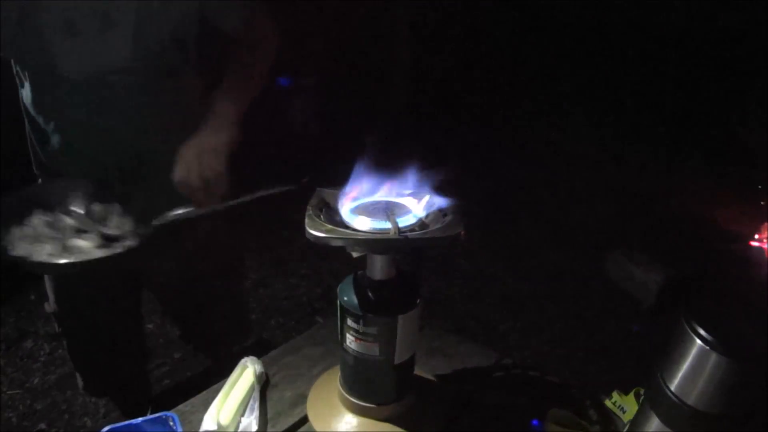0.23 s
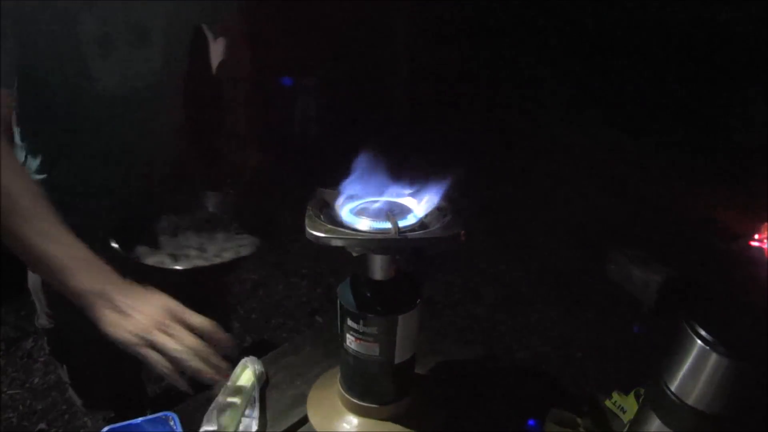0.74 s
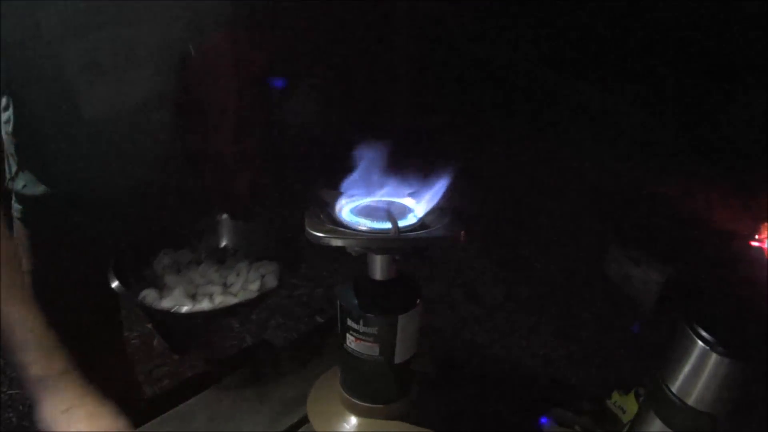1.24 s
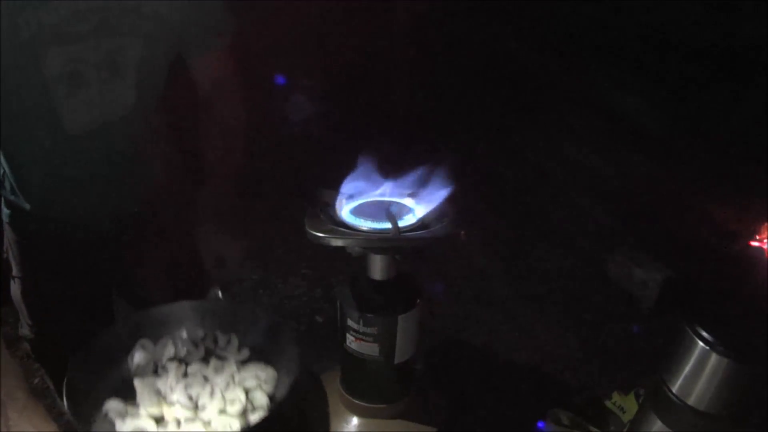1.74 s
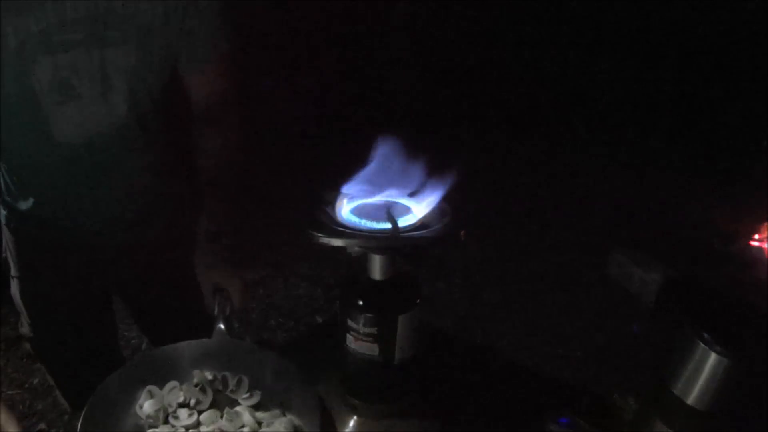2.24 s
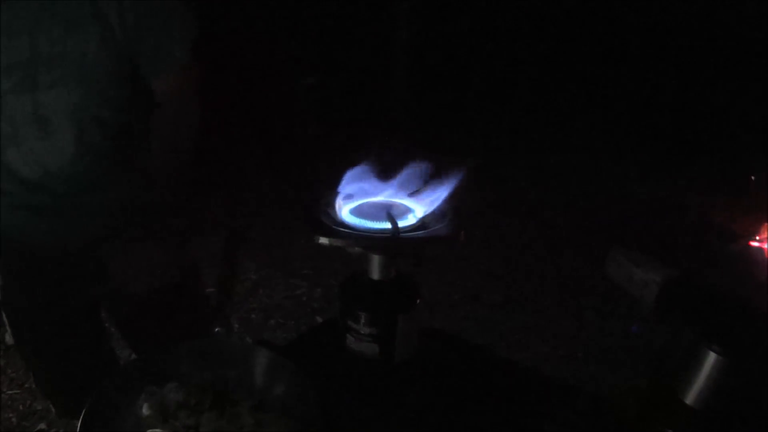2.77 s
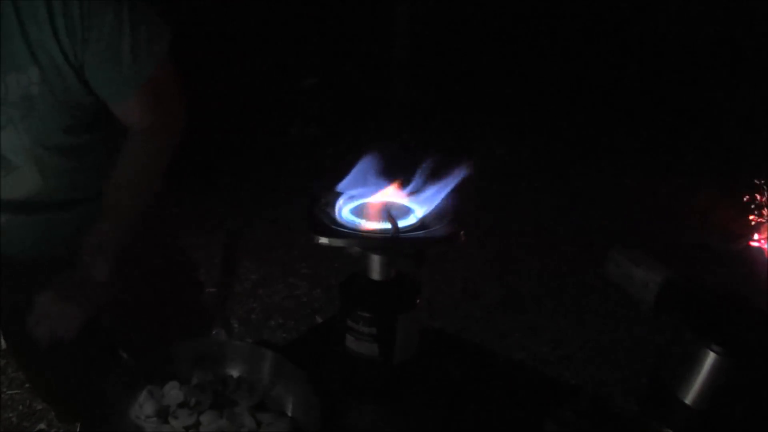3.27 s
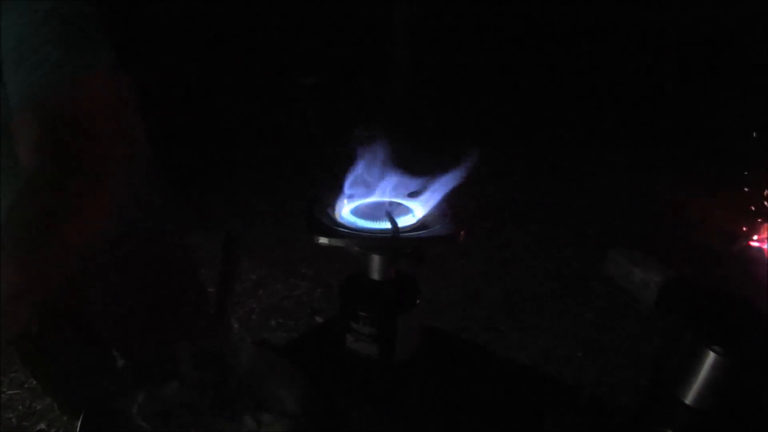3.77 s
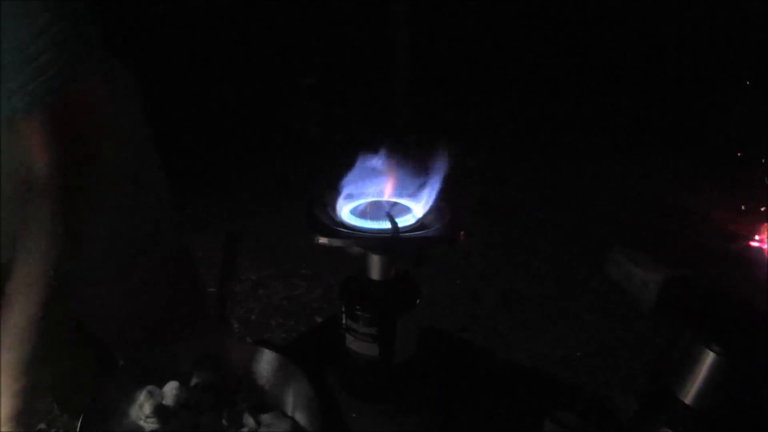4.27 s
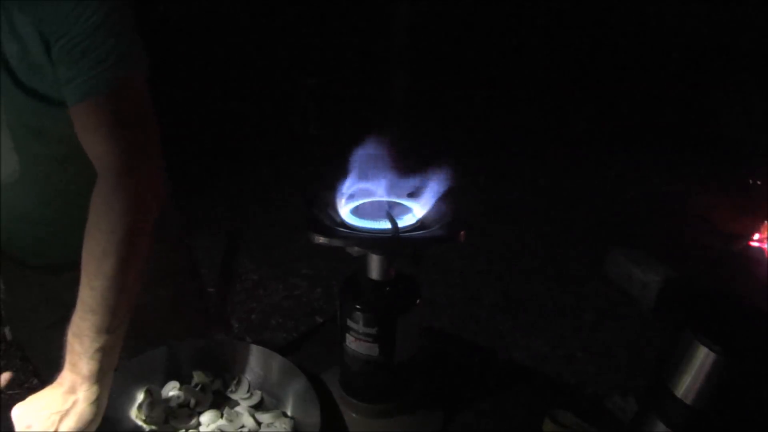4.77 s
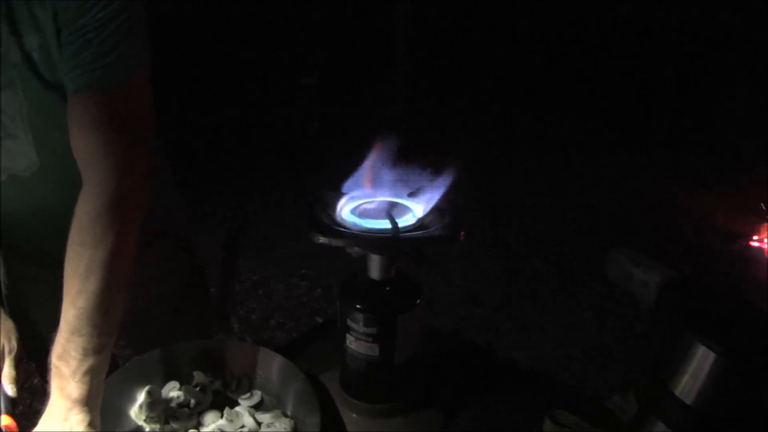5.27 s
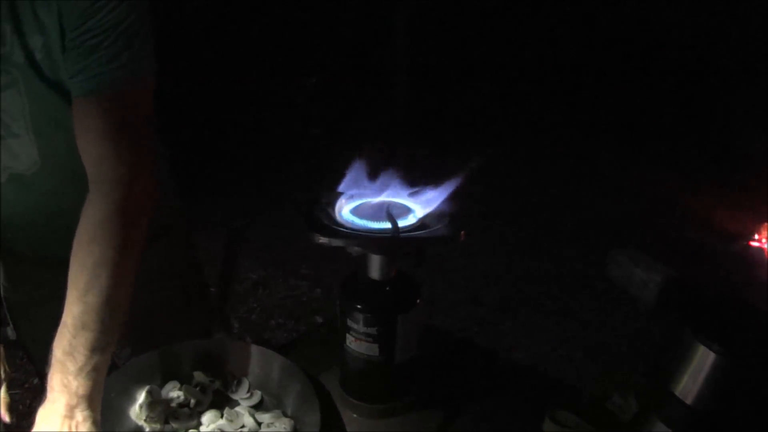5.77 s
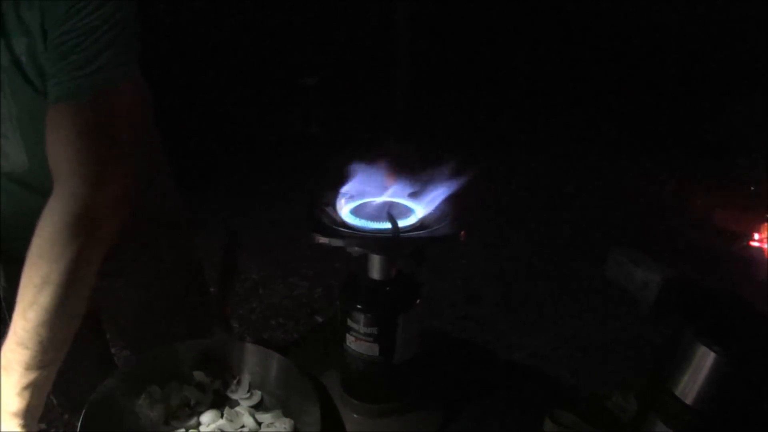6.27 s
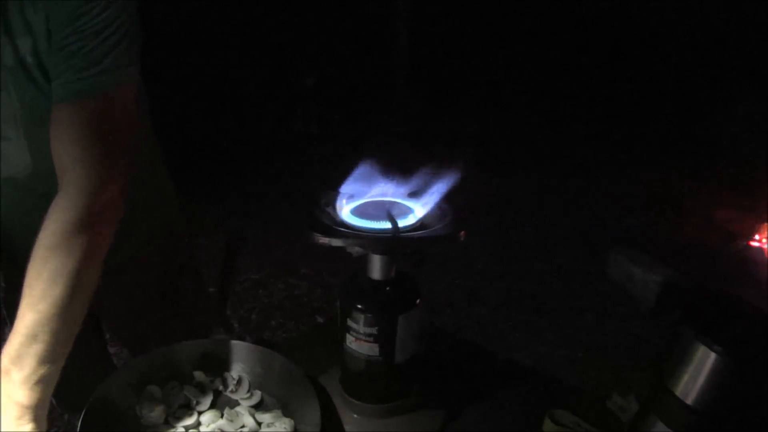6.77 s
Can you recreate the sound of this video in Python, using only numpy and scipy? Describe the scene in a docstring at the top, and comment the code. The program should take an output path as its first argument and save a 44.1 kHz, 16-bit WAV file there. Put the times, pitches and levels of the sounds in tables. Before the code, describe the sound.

Constant bright hiss of a burning camp burner outdoors, with brief film rustling, scattered wooden knocks, a quick stuttering scrape and small dry snaps.

```python
"""Outdoors at night, a propane camp stove burns at full flame: noise shaped by the resonances of its mixing
tube makes the jet's hiss, and low flickering noise makes the flutter of the flame. The cook rustles a
wrapper (showers of tiny creases), drags a thing over the wooden table (a row of slips) and knocks on it
(pushes filtered by the boards). A campfire off to the right snaps now and then, and faint air rumbles."""
import sys
import numpy as np
from scipy import signal
from scipy.fft import rfft, irfft
from scipy.io import wavfile
from scipy.ndimage import uniform_filter1d, map_coordinates

SR = 44100
rng = np.random.default_rng(int(sys.argv[2]) if len(sys.argv) > 2 else 0)


def digitize_waveform(pressure):
    """Quantize a signal to 16-bit integers and store it at the path in sys.argv[1].

    Rows of a 2-D input are taken as channels; values are limited to [-1, 1].
    """
    field = np.atleast_2d(pressure).T
    bounded = np.clip(field, -1, 1)
    quanta = np.round(bounded * 32767).astype(np.int16)
    wavfile.write(sys.argv[1], SR, quanta)


N = 309141

# Resonances of the mixing tube and burner head.
# Each row: frequency in Hz, half-power width in Hz, height in dB on the same relative scale as the jet.
TUBE_MODES = [(1350, 380, -22), (1965, 303, -17.5), (2520, 705, -15), (3090, 480, -14.5), (3873, 320, -15),
              (4220, 370, -15.5), (4622, 230, -2), (4783, 252, -2), (5345, 250, -12.5), (5787, 323, -11),
              (6610, 570, -18), (7580, 300, -15.5), (7797, 246, -11)]
# Broad hiss of the jet. Each row: frequency in Hz, relative density in dB per Hz.
JET_SPECTRUM = [(200, -48), (900, -29), (3000, -33.5), (7000, -31), (8300, -29), (8900, -31.5), (9400, -28),
                (10500, -30.5), (11000, -32.5)]
# Roar of the flame. Each row: frequency in Hz, relative density in dB per Hz.
ROAR_SPECTRUM = [(15, -29), (43, -20), (65, -11), (100, -3), (165, 2), (225, -3), (305, 1), (435, -11),
                 (600, -7.5), (720, -10), (950, -15.5), (1600, -20), (4000, -32)]
# How alike the stove sounds left and right. Each row: frequency in Hz, likeness (held between 0 and 1).
STOVE_LIKENESS = [(30, 1.06), (250, 0.89), (600, 0.67), (1000, 0.59), (1400, 0.78), (1620, 0.53),
                  (1900, 0.81), (3000, 0.9), (4200, 0.81), (4700, 1.03), (5300, 0.84), (7100, 0.9),
                  (7800, 0.93), (8400, 0.86)]
# Where the stove sits in the stereo picture. Each row: frequency in Hz, left minus right in dB.
STOVE_BALANCE = [(100, 0.5), (350, -0.6), (900, -3), (1500, .5), (2400, -1.7), (4700, -1), (6000, -2.5),
                 (8300, -1)]
# Knocks on the table. Each row: start in seconds, level in dB, centre in Hz, spread in octaves,
# rattle t60 in seconds, push relative to the chatter, thump in dB relative to the knock,
# ring in Hz, ring in dB relative to the knock, left minus right in dB.
KNOCKS = [(0.941, -26, 560, 1.7, 0.039, 7.4, -26, 428, -1, -6),
          (2.019, -12.5, 530, 0.95, 0.089, 10, -8.5, 484, 1, 0),
          (2.029, -15.5, 420, 1.36, 0.18, 8.3, -2, 685, -3, 2.5),
          (2.052, -19, 232, 0.97, .06, 14, -7, 170, -3, 3),
          (2.240, -17, 1590, 1.6, 0.18, 3.1, -1.5, 1770, -4.5, 2),
          (3.094, -18, 1600, 1.4, 0.05, 11, -19, 1275, -8, 2),
          (3.101, -25.5, 890, 1.8, 0.24, 3.7, -14, 655, -2, 5),
          (4.081, -17.5, 580, 0.53, .03, 18, -4, 182, -4, 3),
          (4.141, -23, 600, 1.9, 0.066, 7, -10, 432, 2.5, 2),
          (4.242, -18, 1490, 1.1, 0.025, 8.7, -10, 2000, -8, 2),
          (4.246, -19, 950, 0.53, 0.051, 12.5, -15, 803, 2.5, 3)]
# Modes of the table boards. Each row: frequency in Hz, half-power width in Hz, height in dB
# relative to the plain contact.
BOARD_MODES = [(172, 38, -4.5), (322, 84, 5.5), (492, 84, 5.5), (664, 140, 3), (788, 52, 3), (1255, 83, 2),
               (1736, 98, 4.5), (2000, 140, -3)]
# Snaps of the fire and small clicks of things handled. Each row: start in seconds, level in dB before
# the common trim, centre in Hz, spread in octaves, t60 in seconds, left minus right in dB.
SNAPS = [(0.759, -20, 3000, 1.5, 0.015, -12), (0.950, -17, 6500, 0.95, .008, 0),
         (0.962, -21, 8000, 0.67, .015, 0), (0.996, -20, 7000, .7, 0.007, -3),
         (1.269, -20.5, 4000, 1.5, 0.017, 0), (2.782, -15, 1250, 1.85, .019, -13),
         (3.103, -19, 4500, 1.3, .025, 6), (4.141, -17.5, 6950, 0.49, .009, 7),
         (6.156, -13, 900, 1.8, 0.019, -8.5)]
# Tone of the creasing film. Each row: frequency in Hz, relative density in dB per Hz.
CRINKLE_SPECTRUM = [(500, -20), (1700, -7), (3500, -1.5), (6500, 1.5), (9000, -2), (11000, -3)]
# Moments when the flame roars more. Each row: centre in seconds, time to fall to 1/e in seconds, rise in dB.
FLARES = [(.55, 0.34, 2), (4.25, 0.16, 3.5), (5.137, 0.27, 4.5), (6.65, 0.25, 3.5)]
# Grasps of the wrapper. Each row: start of hold in seconds, level in dB, rise in seconds,
# hold in seconds, brightness in dB per octave.
GRASPS = [(0.95, -22, 0.013, 0.031, 1), (1.163, -30, 0.032, 0.018, -1), (1.215, -33.5, 0.026, 0.036, -1),
          (1.289, -22, .01, .006, .5), (5.23, -26.5, .035, 0.048, -0.5)]

TIME = np.arange(N) / SR
HZ = np.fft.rfftfreq(N, 1 / SR)
HIT_TIME = np.arange(16384) / SR  # seconds within one knock, snap or slip

EDGE_HZ = 11100  # upper limit of the whole sound
FLAME_DB = -36.5  # before flares and flicker
# The air stirs most while the cook steps past.
DRAUGHT_DB, STIR_S, STIR_HALF_S, STIR_DB = -61, 2.9, 0.9, 6
# First slip, time between slips, level at mid-stroke, and how much weaker the ends of the stroke are.
DRAG_S, SLIP_S, DRAG_DB, DRAG_ENDS_DB = 3.757, 0.02, -19, -4
# After each grasp the film relaxes, the sooner the more gently it was held; t60 in seconds at a firm grasp.
RELAX_T60, RELAX_GAIN_PER_DB, FIRM_GRASP_DB = 0.5, 0.7, -21.5
# The jet sags slowly as the cylinder cools, and its pitch creeps up as the tube warms.
GAS_DB, SAG_DB_PER_S, WARMING_PERCENT_PER_S = -23, 0.1, 0.22


def gain_of(db):
    """Decibels to an amplitude factor."""
    return 10 ** (np.asarray(db) / 20)


def evened(x):
    """Scales to rms 1."""
    return x / np.sqrt(np.mean(x ** 2) + 1e-20)


def read(points, hz):
    """Reads a table on a log-frequency axis."""
    f, value = np.transpose(points)
    return np.interp(np.log(hz + 1), np.log(f + 1), value)


def panned(sound, pan_db):
    """Tilts a sound between the sides by left minus right in dB."""
    return sound * gain_of([[pan_db / 2], [-pan_db / 2]])


def add(mix, s, sound, pan_db):
    """Places a sound in time and between left and right."""
    part = mix[:, round(s * SR):][:, :sound.shape[1]]
    part += panned(sound, pan_db)[:, :part.shape[1]]


def humps(modes, hz):
    """Summed power of a set of bell-shaped resonances."""
    return sum(gain_of(db) ** 2 * 0.5 ** ((2 * (hz - f) / width) ** 2) for f, width, db in modes)


def wander(rate_hz):
    """Slow random drift of rms 1."""
    return evened(irfft(rfft(rng.standard_normal(N)) / (1 + (HZ / rate_hz) ** 2), N))


def surge(s, half_s):
    """A smooth rise to 1 and fall, centred on a moment."""
    return np.exp(-((TIME - s) / half_s) ** 2)


def pair(common, apart, same):
    """Left and right from a shared part and an opposed part."""
    same = np.clip(same, 0, 1)
    shared = np.sqrt((1 + same) / 2) * common
    opposed = np.sqrt((1 - same) / 2) * apart
    return shared + opposed * np.array([[1], [-1]])


def turbulence(gain):
    """Stereo noise of the given spectrum, from where the stove stands."""
    spectrum = pair(*rfft(rng.standard_normal((2, N))), read(STOVE_LIKENESS, HZ))
    return evened(irfft(spectrum * gain * gain_of(read(STOVE_BALANCE, HZ) * np.array([[0.5], [-0.5]])), N))


def colour(x, hz, octaves, modes=()):
    """Minimum-phase filter: a broad band set by the hardness of the contact, with the body's modes on top."""
    f = abs(np.fft.fftfreq(len(HIT_TIME), 1 / SR)) + 1
    band = 1 / (1 + (np.log2(f / hz) / octaves) ** 2 / 2) ** 2
    treble_loss = np.hypot(1, f / (hz * 2 ** (2 * octaves)))
    gain = np.sqrt(1 + humps(modes, f)) * band / treble_loss
    # the phase that follows from the gain makes the sound start at once
    response = np.exp(np.conj(signal.hilbert(np.log(evened(gain) + 1e-5))))
    return np.fft.ifft(np.fft.fft(x) * response).real


def blow(t60, push, same):
    """One sharp push followed by a dying chatter of the contact."""
    force = pair(*rng.standard_normal((2, len(HIT_TIME))), same) * gain_of(-60 * HIT_TIME / t60)
    force[:, 0] += push
    return force


def ring(hz, t60):
    """One dying mode of the struck thing."""
    return np.sin(2 * np.pi * hz * HIT_TIME) * gain_of(-60 * HIT_TIME / t60)


def draught(corner_hz=70):
    """Stirring air: faint low noise, different on each side, that swells once."""
    low_band = HZ / (HZ + 15) / (1 + (HZ / corner_hz) ** 2)
    rumble = irfft(rfft(rng.standard_normal((2, N))) * low_band, N)
    return evened(rumble) * gain_of(DRAUGHT_DB + STIR_DB * surge(STIR_S, STIR_HALF_S))


def snaps(trim_db=-3):
    """Campfire snaps and handling clicks: short dry cracks with hardly any ring."""
    out = np.zeros((2, N))
    for s, db, hz, octaves, t60, pan_db in SNAPS:
        crack = colour(blow(t60, push=7.1, same=0.93), hz, octaves)
        add(out, s, gain_of(db + trim_db) * crack, pan_db)
    return out


def grasp(s, db, rise_s, hold_s):
    """Strength of one grasp: the fingers close, hold, and the film relaxes."""
    t60 = RELAX_T60 * np.exp(RELAX_GAIN_PER_DB * (db - FIRM_GRASP_DB))
    closing = np.where(TIME < s, surge(s, rise_s), 1)
    relaxing_s = np.maximum(TIME - s - hold_s, 0)
    return closing * gain_of(db - 60 * relaxing_s / t60)


def wrapper(creases_per_s=3600, size_db=2.5, pan_db=1.5, pivot_hz=6000):
    """Tiny creases of thin film buckle at random, a few of them much louder than the rest."""
    sizes = gain_of(size_db * np.minimum(rng.exponential(1, (2, N)), 5)) * rng.choice([-1, 1], (2, N))
    buckles = sizes * (rng.random((2, N)) < creases_per_s / SR)
    creases = rfft(pair(*buckles, 0.83))
    octave = np.log2(np.maximum(HZ, CRINKLE_SPECTRUM[0][0]) / pivot_hz)
    rustle = np.zeros((2, N))
    for s, db, rise_s, hold_s, brightness in GRASPS:
        tone = gain_of(read(CRINKLE_SPECTRUM, HZ) + brightness * octave)
        rustle += evened(irfft(creases * tone, N)) * grasp(s, db, rise_s, hold_s)
    return panned(rustle, pan_db)


def scrape(count=5, first_hz=2700, last_hz=1500, octaves=1.47, t60=0.058,
           ring_hz=1680, ring_t60=0.059, first_db=-16, last_db=1, pan_db=4):
    """A dragged thing sticks and slips at an even pace; along the stroke the slips grow duller and ring more."""
    out = np.zeros((2, N))
    for k, along in enumerate(np.linspace(0, 1, count)):
        hz = first_hz + (last_hz - first_hz) * along
        tick = colour(blow(t60, push=7.3, same=0.64), hz, octaves, BOARD_MODES)
        ring_db = first_db + (last_db - first_db) * np.sqrt(along)
        note = ring(ring_hz * rng.uniform(0.93, 1.06), ring_t60) * gain_of(ring_db)
        slip_db = DRAG_DB + DRAG_ENDS_DB * (2 * along - 1) ** 2
        add(out, DRAG_S + k * SLIP_S, gain_of(slip_db) * (tick + note), pan_db)
    return out


def knocks(thump_hz=175, thump_octaves=0.94, swell_s=0.018, ring_t60=0.083):
    """Each blow rattles the boards and rings the thing set down; the heavy table top thumps low and later."""
    out = np.zeros((2, N))
    swell = (HIT_TIME / swell_s * np.exp(1 - HIT_TIME / swell_s)) ** 2
    for s, db, hz, octaves, t60, push, thump_db, ring_hz, ring_db, pan_db in KNOCKS:
        rattle = colour(blow(t60, push, same=0.52), hz, octaves, BOARD_MODES)
        noise = pair(*rng.standard_normal((2, len(HIT_TIME))), 0.44)
        thump = colour(noise, thump_hz, thump_octaves, BOARD_MODES) * swell
        thump = evened(thump) * np.sqrt(np.mean(swell ** 2))
        note = ring(ring_hz, ring_t60)
        knock = rattle + gain_of(thump_db) * thump + gain_of(ring_db) * note
        add(out, s, gain_of(db) * knock, pan_db)
    return out


def flame(flicker_db=2.16, flicker_hz=10):
    """The burning gas roars low, flickers, and flares now and then."""
    flare_db = sum(db * surge(s, half_s) for s, half_s, db in FLARES)
    roar = turbulence(gain_of(read(ROAR_SPECTRUM, HZ)))
    return roar * gain_of(FLAME_DB + flare_db + flicker_db * wander(flicker_hz))


def jet(flutter_db=0.73, flutter_hz=25):
    """Gas rushes from the orifice and sounds the resonances of the warming tube."""
    power = humps(TUBE_MODES, HZ) + gain_of(read(JET_SPECTRUM, HZ)) ** 2
    hiss = turbulence(np.sqrt(power))
    # reading the noise ever faster raises its pitch
    pitch = 1 + WARMING_PERCENT_PER_S / 100 * (TIME - TIME.mean())
    place = [np.cumsum(pitch)]
    hiss = np.array([map_coordinates(side, place, order=3, mode="mirror") for side in hiss])
    return hiss * gain_of(GAS_DB - SAG_DB_PER_S * TIME + flutter_db * wander(flutter_hz))


def scene():
    """The stove, the campfire and the cook's handling in open air."""
    return draught() + snaps() + wrapper() + scrape() + knocks() + flame() + jet()


def record(dry, threshold_db=-19, recover_db_per_s=28, squeeze=0.26):
    """Gain control ducks everything around loud peaks and recovers steadily; then the treble is cut off."""
    power_db = 10 * np.log10(abs(uniform_filter1d((dry ** 2).mean(0), size=300)) + 1e-12)
    fall_db = TIME * recover_db_per_s
    held_db = np.maximum.accumulate(power_db + fall_db) - fall_db
    over_db = np.maximum(held_db - threshold_db, 0)
    ducked = dry / gain_of(squeeze * uniform_filter1d(over_db, size=200))
    low_pass = signal.firwin(601, EDGE_HZ, window=("kaiser", 9), fs=SR)
    return signal.oaconvolve(ducked, low_pass[None], "same")


dry = scene()
out = record(dry)
digitize_waveform(out)
```